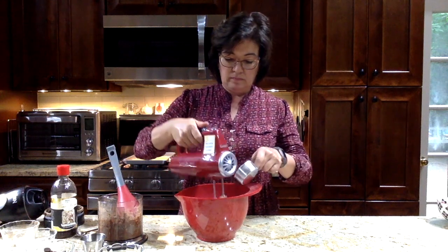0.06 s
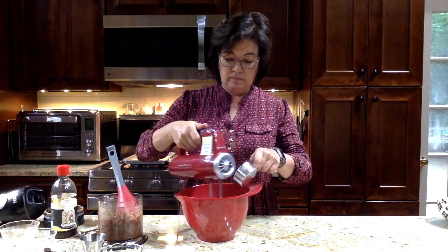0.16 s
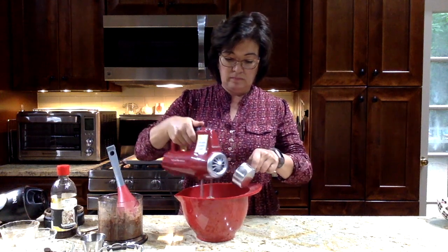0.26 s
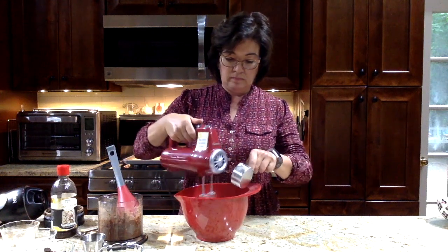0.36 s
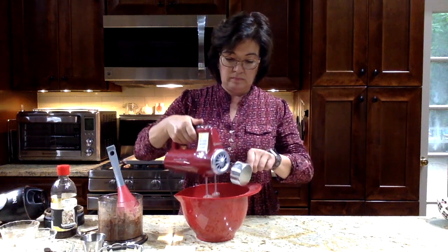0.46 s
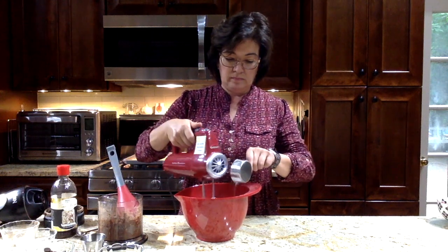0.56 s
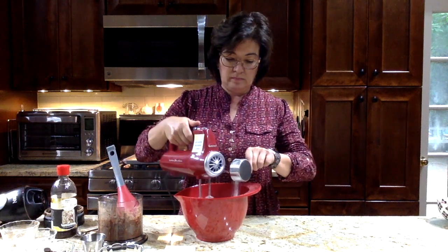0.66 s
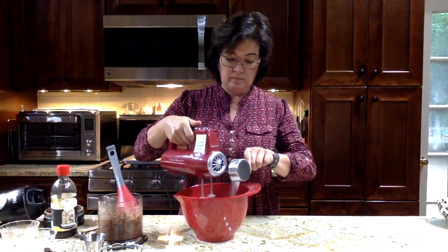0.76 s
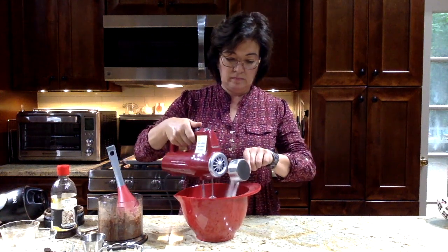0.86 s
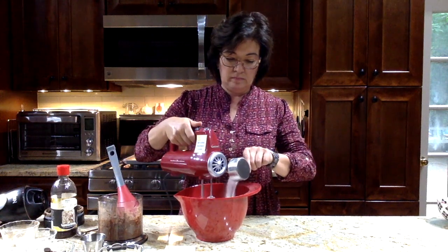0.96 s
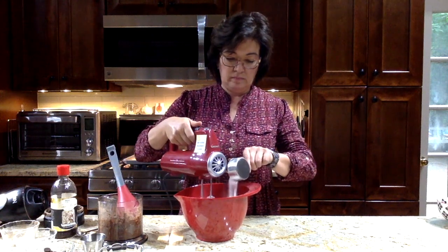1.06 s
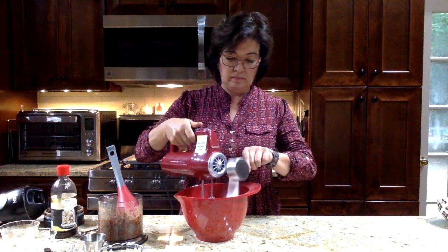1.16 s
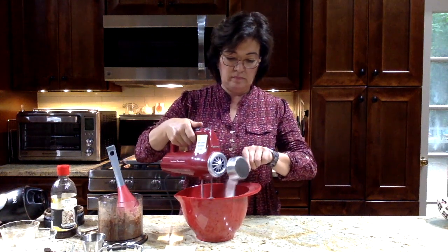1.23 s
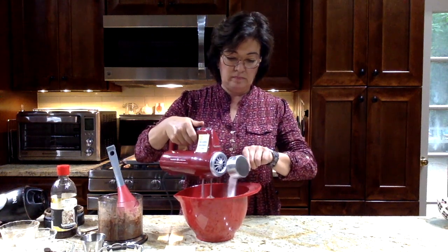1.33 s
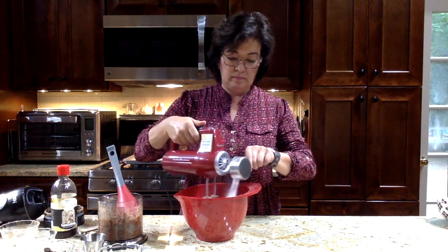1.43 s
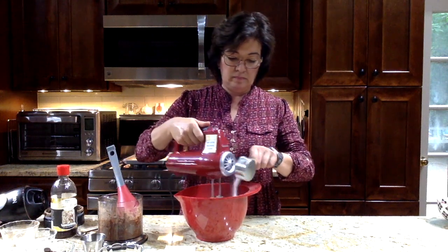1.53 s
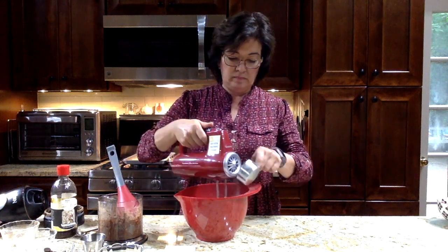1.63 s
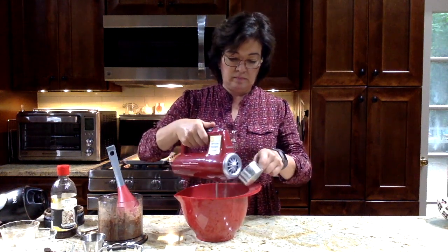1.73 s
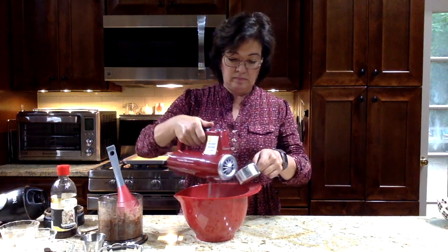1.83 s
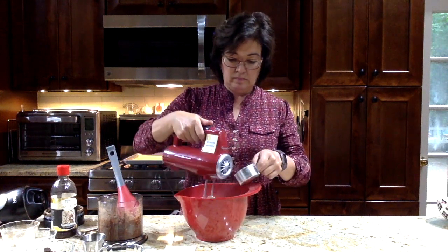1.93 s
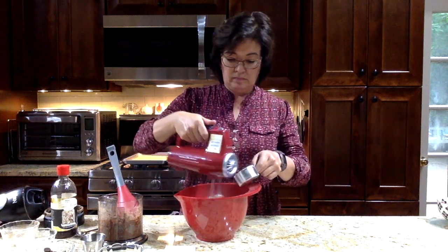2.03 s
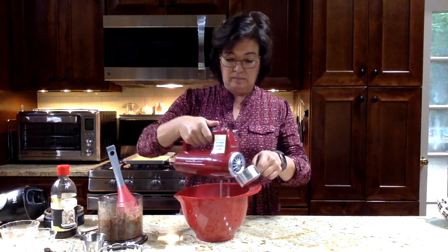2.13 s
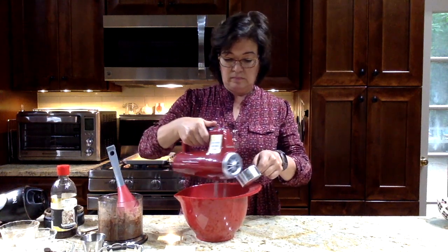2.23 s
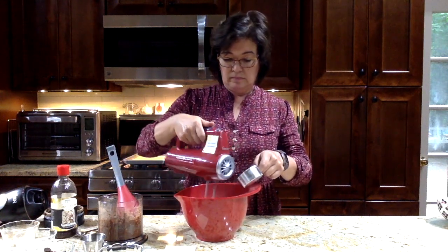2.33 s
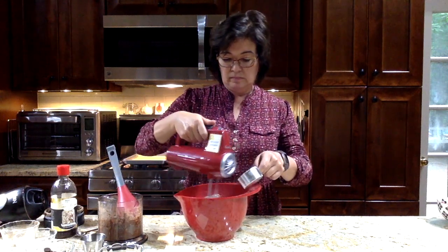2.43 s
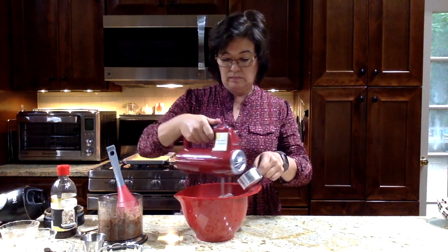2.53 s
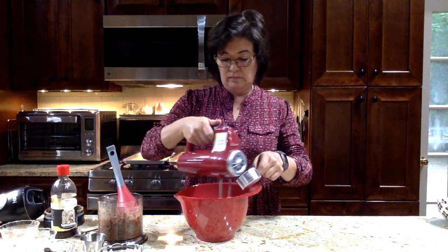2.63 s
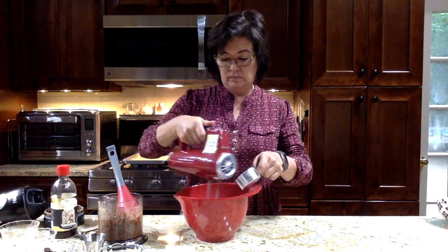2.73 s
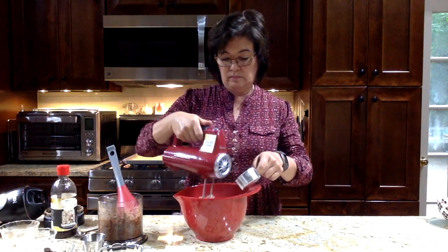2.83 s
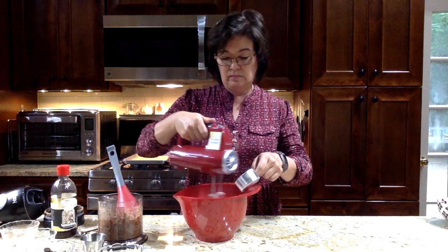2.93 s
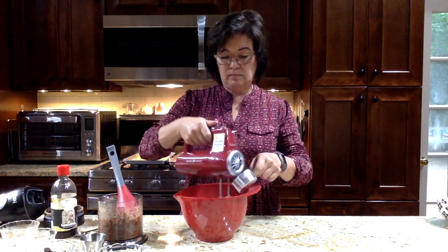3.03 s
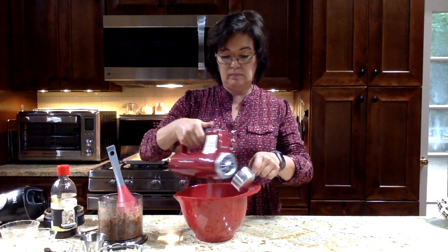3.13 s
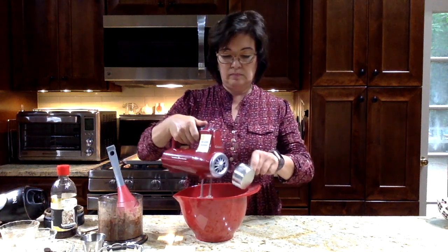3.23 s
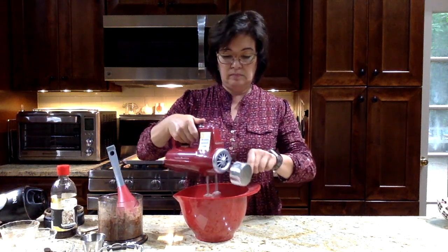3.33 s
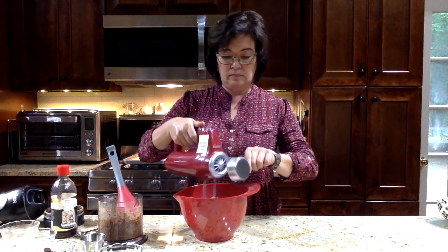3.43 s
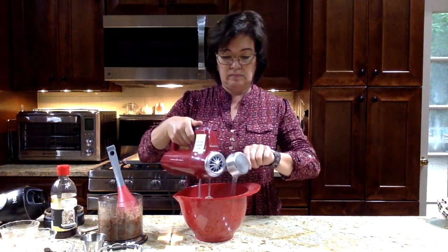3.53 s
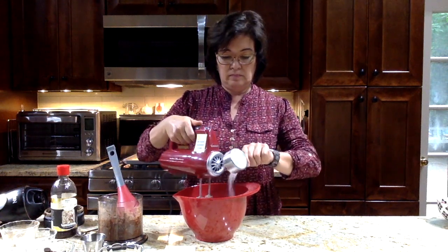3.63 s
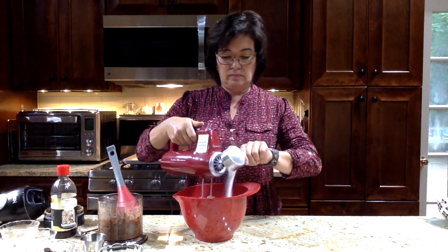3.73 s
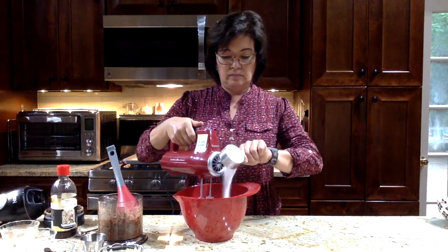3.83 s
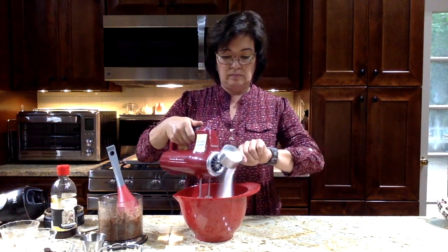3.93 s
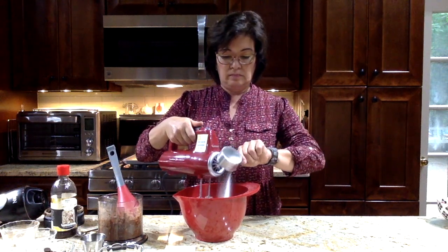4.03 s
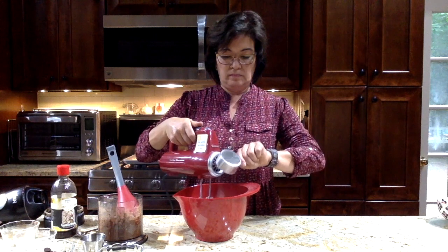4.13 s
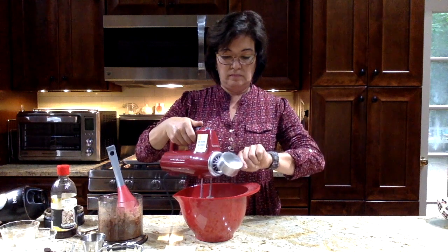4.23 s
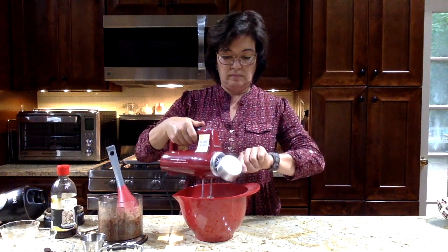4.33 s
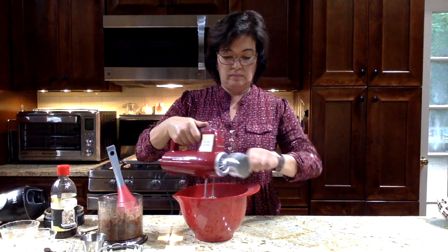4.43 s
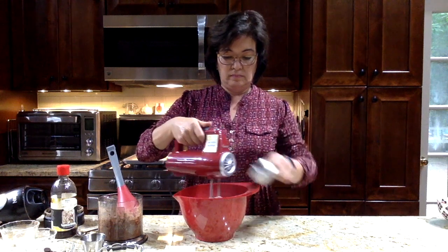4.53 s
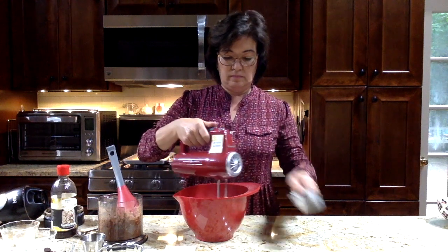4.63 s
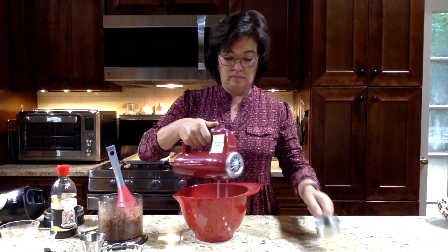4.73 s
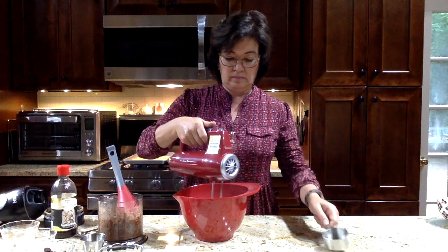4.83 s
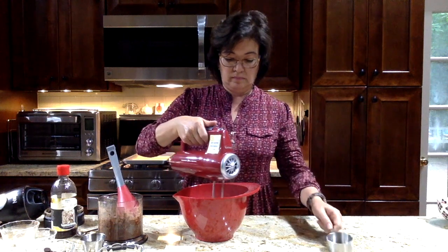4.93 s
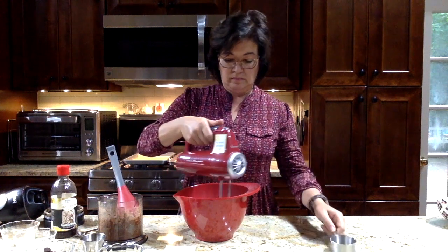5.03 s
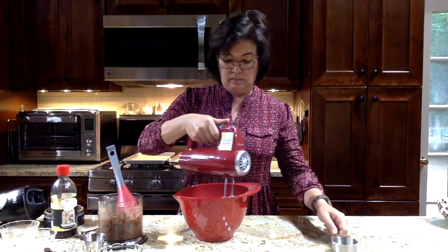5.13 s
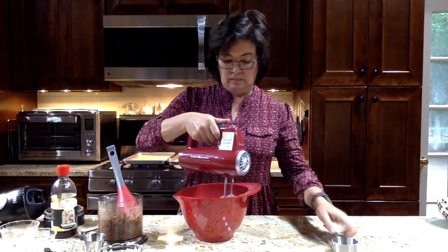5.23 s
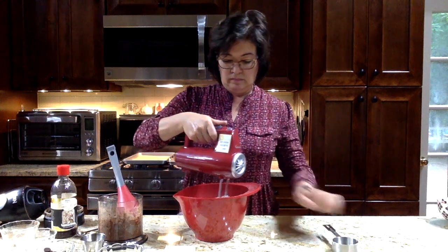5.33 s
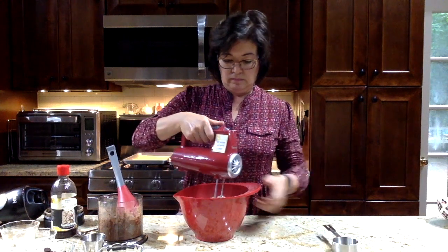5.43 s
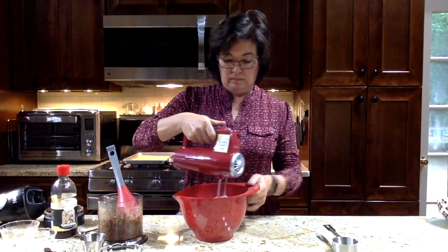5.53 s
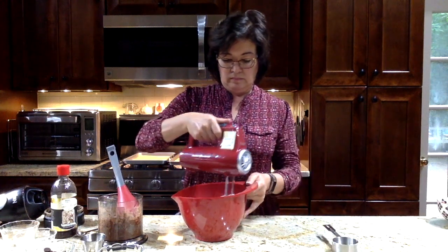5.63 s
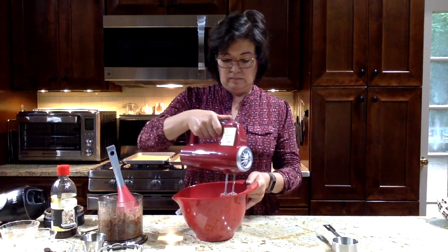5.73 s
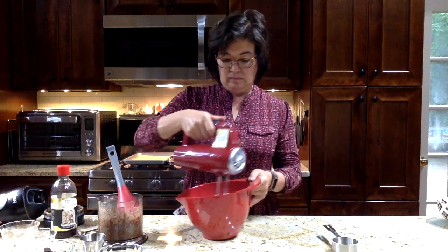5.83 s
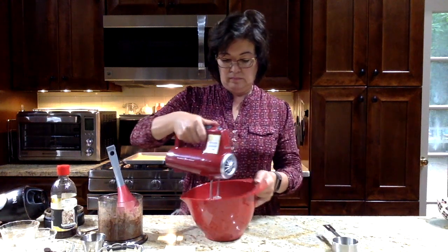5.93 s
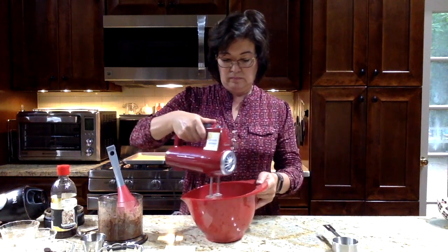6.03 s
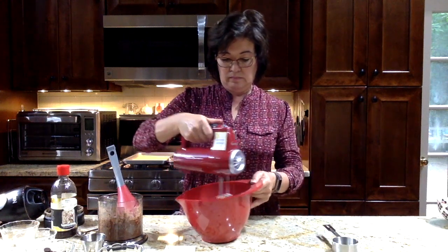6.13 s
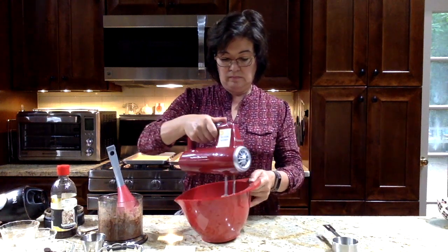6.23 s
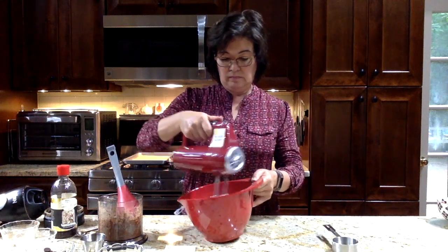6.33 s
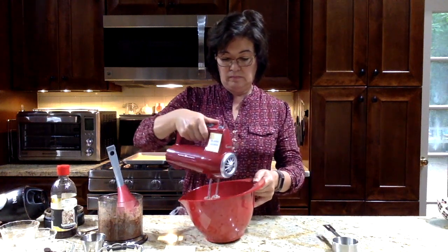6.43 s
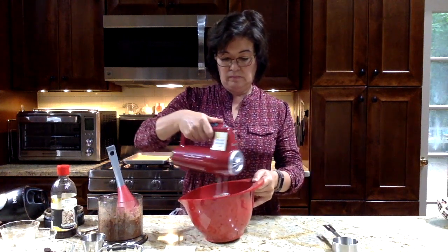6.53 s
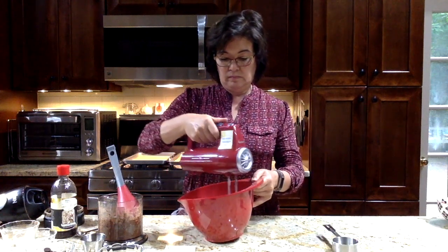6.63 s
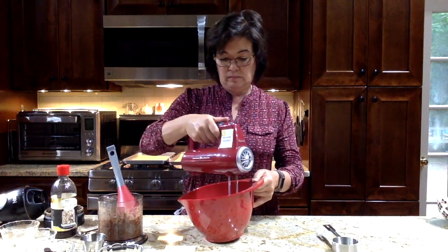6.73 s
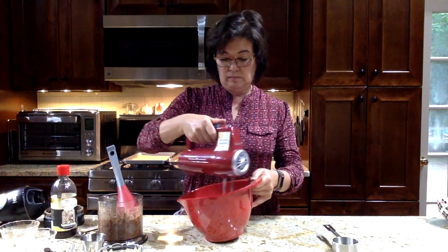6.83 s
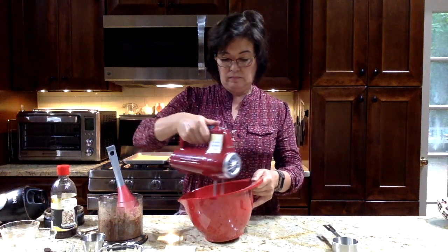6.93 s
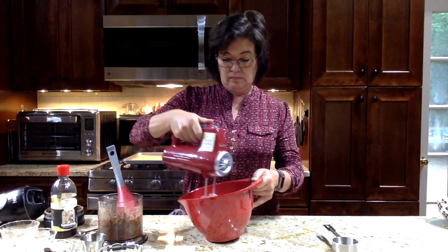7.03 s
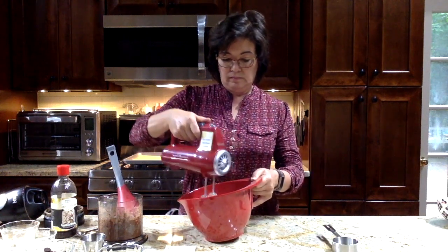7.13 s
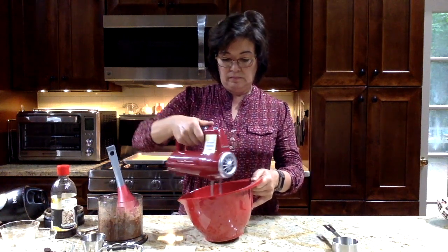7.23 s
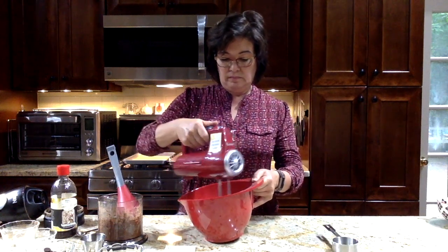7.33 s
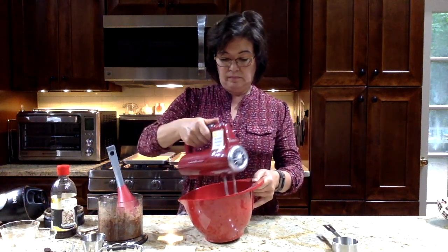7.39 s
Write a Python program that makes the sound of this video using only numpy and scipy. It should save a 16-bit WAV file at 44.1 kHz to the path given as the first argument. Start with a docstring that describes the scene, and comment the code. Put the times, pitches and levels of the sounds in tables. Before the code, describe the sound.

Steady whirring of a kitchen hand mixer whipping wet foam, with soft gulps, a small metal cup skid and a sharp burst of beater clatter.

```python
"""A motor hums and whines steadily over the rush of its fan: an electric hand mixer in a small kitchen, in mono.
Near-harmonic sines at multiples of the shaft rate make the hum; filtered noise makes the fan.
Its beaters spatter, slosh and fizz through egg whites, harder as they dip: filtered impacts and decaying tones.
The wires squeak (stick-slip tones) and rattle (struck resonances) against the plastic bowl, loudest when
a hand takes hold of it after setting down a cup."""
import sys
import numpy as np
from scipy import signal
from scipy.fft import rfft, irfft
from scipy.io import wavfile
from scipy.ndimage import uniform_filter1d

SR = 44100
rng = np.random.default_rng(int(sys.argv[2]) if len(sys.argv) > 2 else 0)


def wrap_up_sound(samples):
    """Save the sound to the file named by the first command line argument, as 16-bit audio."""
    columns = np.atleast_2d(samples).T
    # keep every value between -1 and 1, then stretch to whole-number steps
    tamed = np.clip(columns, -1, 1)
    steps = np.round(tamed * 32767).astype(np.int16)
    wavfile.write(sys.argv[1], SR, steps)


N = 328986
T = np.arange(N) / SR  # t/s of every sample
TOP_HZ = 15700  # upper band limit

# The shaft slows under load, and a little more as the foam stiffens
SHAFT_HZ, SAG_HZ_PER_DB, SAG_HZ_PER_S = 435.5, .22, .28
COMMUTATOR_BARS = 16
BEATER_GEAR = 24  # shaft turns for one beater turn
GULP_HZ, GULP_SPREAD = 188, .04  # mean pitch, and its relative standard deviation

# Levels of events and colours are relative: each source sets its own gain.
# Motor hum: [multiple of the shaft rate, rms level/dB at zero load, growth/(dB per dB of load), waver/dB]
MOTOR_HARMONICS = [(1.001, -58, 0, 1), (2.001, -52, 0.3, 1.3), (2.998, -51.5, 0.24, 3),
                   (4.01, -55, -0.5, 3), (5.014, -56.5, 0.86, 3.5), (5.99, -62.5, 0, 2.5),
                   (12, -71, 1, 2.5), (17, -71, 3, 2.5), (24, -68, 0, 1), (32, -67, -1, 2)]
# Spectrum of the cooling air and brush noise: [f/Hz, level/dB]
FAN_SPECTRUM = [(35, -67), (60, -30), (385, -7.5), (433, -17.5), (497, -12), (627, -26), (773, -10.5),
                (869, -10), (976, -12), (1320, 4.5), (2050, -9.5), (5080, -0.5), (7370, -16),
                (12600, -10.5), (15500, -20)]
# Spectrum of the lower, churning foam noise: [f/Hz, level/dB]
CHURN_SPECTRUM = [(250, -29), (400, -11), (520, -15.5), (620, -4.5), (780, -12), (980, -7), (1130, 1),
                  (1550, -1.5), (1850, -3.5), (2100, -11.5), (2600, -7.5), (3500, -37)]
# Spectrum of the droplets that spatter: [f/Hz, level/dB]
SPATTER_SPECTRUM = [(1200, -15), (2100, -5.5), (2900, -7), (3200, -2.5), (3700, -0.5), (4350, -6),
                    (4900, -1.5), (5250, -5), (5800, -4), (6400, -11), (7200, -33), (9000, -24)]
# Spectrum of the fine spray: [f/Hz, level/dB]
SPRAY_SPECTRUM = [(5500, -26), (6800, 0.5), (7400, -1.5), (8200, -0.5), (9250, 4), (9900, -1), (10400, 1.5),
                  (11600, -2), (12500, 2), (13200, 2.5), (13900, 0.5), (15600, -1)]
# Spectrum of the foam mass as it swills: [f/Hz, level/dB]
SWILL_SPECTRUM = [(25, -34), (65, -37), (90, -8.5), (125, -9), (180, 5), (225, -1.5), (260, -4), (320, 6),
                  (400, -2.5), (600, -12)]
# How hard the beaters bite as the hand lowers and lifts them: [t/s, load level/dB]
BEATER_LOAD = [(0, 3.5), (0.27, 1.5), (0.72, 2.5), (1.15, -1.5), (1.55, -5), (1.95, -1.5), (2.13, -2.5),
               (2.35, 1), (2.52, -1.0), (2.7, 4.0), (3.3, 1.5), (3.95, -4.5), (4.52, -5.5), (4.8, 3.5),
               (5.25, 4.5), (5.6, 2.5), (5.95, 5.5), (7.46, 1.0)]
# The commutator whine flares up: [t/s at the peak, half length/s, rise in level/dB]
WHINE_FLARES = [(.49, 0.065, 8), (.94, 0.11, 5), (4.54, .05, 9.5), (6.1, .05, 8), (6.45, 0.06, 17),
                (7.18, 0.069, 19)]
# The beaters graze the bowl wall and fling more foam: [t/s at the peak, half length/s, rise in level/dB]
WALL_GRAZES = [(.46, 0.058, 6), (2.67, 0.07, 6.5), (3.05, .05, 3.5), (5.26, 0.093, 3.5), (5.77, 0.076, 7.5),
               (6.32, 0.059, 4.5), (6.79, 0.077, 7), (7.19, .06, 4.5)]
# Large air pockets that close in the foam: [t/s, peak level/dB]
AIR_POCKETS = [(.678, -44), (.784, -42), (.828, -41), (1.564, -38.5), (2.152, -38), (2.56, -34),
               (2.659, -31.5), (3.05, -31.5), (3.299, -38), (3.342, -36.5), (3.695, -40), (4.718, -35),
               (4.826, -34), (5.07, -35), (5.135, -29), (5.236, -32), (5.392, -33), (5.417, -33),
               (5.566, -38), (5.67, -30), (6.513, -34)]
# A beater knocks on the bowl: [t/s, level/dB, brightness/(dB per octave)]
BEATER_KNOCKS = [(0.423, -28.5, 3), (2.642, -28, 13), (2.664, -25, 16), (2.687, -30, 2), (5.721, -21, -1),
                 (5.7264, -10.5, 2), (5.7445, -8.5, -2), (5.752, -9.5, -1.5), (5.756, -11.5, 5.5),
                 (5.763, -6, -2.5), (5.768, -10, 2), (5.801, -9.5, -12), (5.806, -13.5, -13),
                 (5.813, -9, -5.5), (5.82, -23, 10), (5.845, -20, -8), (5.855, -27, -7), (6.301, -19, -2),
                 (6.309, -17.5, -2), (6.3175, -21.5, 2)]
# Modes with which bowl and beaters ring: [f/Hz, width/Hz, level/dB]
BOWL_MODES = [(192, 230, -27.5), (640, 190, -24.5), (1123, 170, -11.5), (1530, 640, -20), (2160, 320, -18),
              (2800, 280, -3), (3063, 170, 1), (3278, 140, 2.5), (3690, 220, 6), (3867, 146, 4.5),
              (4820, 330, -2.5), (5380, 180, -11), (5740, 210, -9), (7000, 290, -17), (7900, 490, -10.5),
              (8880, 260, -12.5), (10380, 970, -11.5), (10850, 450, -13.5), (11850, 970, -20),
              (14300, 540, -14), (15200, 600, -27)]
# A wire catches and slips on the bowl: [t/s, peak level/dB, f/Hz, length/s]
WIRE_SLIPS = [(2.653, -18.5, 7900, 0.0036), (2.654, -20, 3820, 0.006), (2.663, -23, 3780, 0.0051),
              (2.695, -21, 3970, 0.013), (5.227, -16.5, 8080, 0.0048), (5.278, -22, 14900, .006),
              (5.292, -26, 7600, .008), (5.292, -24, 9750, .006), (5.753, -16, 14200, 0.0064),
              (5.944, -18.5, 3560, 0.0056), (6.299, -7, 4700, 0.0052), (6.31, -17, 15000, .006),
              (6.746, -20, 3400, 0.0066), (6.757, -16, 3570, 0.0077), (6.814, -23, 7640, .006),
              (6.814, -16, 15300, .006)]
# A steel measuring cup skids as it is set on the counter: [t/s, peak level/dB, f/Hz, length/s]
CUP_SKID = [(4.991, -13, 1883, 0.0096)]


def motor(turns, load):
    """Periodic forcing: near-harmonics of the shaft rate grow or shrink with load and waver as the hand moves."""
    turns = turns + 0.0085 * walk(12)  # rms phase jitter in turns
    hum = 0
    for multiple, db, per_load, waver_db in MOTOR_HARMONICS:
        level = db + per_load * load + waver_db * np.minimum(walk(10), 1)
        phase = 2 * np.pi * (multiple * turns + rng.random())
        hum = hum + undb(level) * np.sin(phase)
    return np.sqrt(2) * hum


def whine(turns, load, db=-55, per_load=0.38, waver_db=2.5):
    """Bar-passing excitation: the brushes sing, unevenly, at the rate of the commutator bars."""
    level = db + per_load * load + swells(WHINE_FLARES) + waver_db * walk(16)
    jittered = turns + 0.0085 * walk(12)
    return np.sqrt(2) * undb(level) * np.sin(2 * np.pi * COMMUTATOR_BARS * jittered)


def fan(turns, db=-45, depth=0.35):
    """Amplitude-modulated turbulence: cooling air and brush noise pulse once a shaft turn."""
    pulse = 1 + depth * np.sin(2 * np.pi * turns)
    return undb(db) * colour(rng.standard_normal(N) * pulse, FAN_SPECTRUM)


def foam(turns, load, graze, surge_db=0.7, lap_db=0.2, blade_db=0.2):
    """Random impact excitation: wires cut the foam four times a beater turn and throw droplets on the bowl."""
    angle = 2 * np.pi * turns / BEATER_GEAR + 2 * walk(5)  # radians, with a wander
    stroke = undb(lap_db * np.sin(angle) + blade_db * np.sin(4 * angle) + surge_db * walk(45))
    spatter = colour(stroke * droplets(9000, 1.4), SPATTER_SPECTRUM)
    spray = colour(stroke * droplets(16000, 2.7), SPRAY_SPECTRUM)
    churn = colour(stroke * droplets(4000, 1.64), CHURN_SPECTRUM)
    out = driven(load, graze, db=-38.5, per_load=1.14, per_graze=0.48) * spatter
    out += driven(load, graze, db=-43.0, per_load=1.0, per_graze=0.91) * spray
    out += driven(load, graze, db=-43.0, per_load=1.0, per_graze=0.88) * churn
    return out


def slosh(load, graze, lurch_db=2.5):
    """Bulk motion of a fluid: the foam lurches round the bowl, full of small closing air pockets."""
    gain = driven(load, graze, db=-55.5, per_load=1.5, per_graze=0.8)
    return gain * undb(lurch_db * walk(9)) * colour(droplets(300, 4.0), SWILL_SPECTRUM)


def fizz(spray_gain, count=900, low_hz=7500, high_hz=15500, life_s=0.0076, spread_db=3.0):
    """Bubble resonance: tiny bubbles ring briefly in the foam, as loud as the spray is thick."""
    out, t = np.zeros(N), T[:SR // 20]
    ring = t / life_s * np.exp(1 - t / life_s)
    for when, size, strength, glide in rng.random((count, 4)):
        i = int(when * N)
        hz = low_hz + size * (high_hz - low_hz)
        tone = np.sin(2 * np.pi * hz * t * (1 + (glide - .5) * t / 2))  # pitch drifts slightly up or down
        level = spread_db * (min(-np.log(strength), 3) - 2)
        add(out, T[i], spray_gain[i] * undb(level) * ring * tone)
    return out


def gulps(rise_s=0.0084, sharpness=4.8, gain_db=-1.0, wake_db=-8, wake_s=0.022):
    """Cavity collapse: each air pocket thuds softly for about two cycles, and foam tumbles in behind it."""
    out, wake, t = np.zeros(N), np.zeros(N), T[:SR // 8]
    swell = (t / rise_s * np.exp(1 - t / rise_s)) ** sharpness
    tumble = np.minimum(t / rise_s, 1) * np.exp(-t / wake_s)
    for s, db in AIR_POCKETS:
        hz = GULP_HZ * (1 + GULP_SPREAD * rng.standard_normal())
        add(out, s, undb(db + gain_db) * swell * np.sin(2 * np.pi * hz * (t - rise_s)))
        add(wake, s, undb(db + wake_db) * tumble)
    return out + wake * colour(rng.standard_normal(N), SWILL_SPECTRUM)


def knocks(chatter_s=0.0041, bounce_s=0.0008):
    """Modal excitation: a wire strikes, chatters briefly over the bowl wall and rings its modes."""
    out, t = np.zeros(N), T[:4096]
    f = np.maximum(np.fft.rfftfreq(len(t), 1 / SR), 1)
    body = sum(undb(db) / (1 + 1j * (f * f - hz * hz) / (f * width)) ** 2 for hz, width, db in BOWL_MODES)
    octaves = np.log2(np.maximum(f / 3500, 1))  # brightness acts above 3500 Hz
    for s, db, tilt_db in BEATER_KNOCKS:
        strength = rng.uniform(-1.0, 1, len(t))
        bounces = rng.random(len(t)) < 1 / (bounce_s * SR)
        push = strength * bounces * np.exp(-t / chatter_s)
        push[0] = 1  # the first strike
        ring = irfft(rfft(push) * body * undb(tilt_db * octaves))
        add(out, s, undb(db) * ring / np.std(ring[:SR // 200]))  # level over the first 5 ms
    return out


def squeaks(table, octave_db, gain_db):
    """Stick-slip friction: an unsteady tone, with its octave where the band allows, lasts milliseconds."""
    out, t = np.zeros(N), T[:SR // 40]
    for s, db, hz, length in table:
        swell = np.clip(t / (.18 * length), 0, 1) * np.exp(-(t / length) ** 4)
        pitch = hz * (1 + .018 * unit(uniform_filter1d(rng.standard_normal(len(t)), size=16)))
        phase = 2 * np.pi * np.cumsum(pitch) / SR
        octave = (2 * hz < TOP_HZ) * undb(octave_db) * np.sin(2 * phase)
        add(out, s, undb(db + gain_db) * swell * (np.sin(phase) + octave))
    return out


def kitchen(x, t60, wet_db):
    """Reverberation: counter and cupboards answer with a short, dense, exponentially decaying tail."""
    t = T[:SR // 2]
    tail = rng.standard_normal(len(t)) * np.exp(-np.log(1000) * t / t60) * (t > .004)
    wet = signal.fftconvolve(x, tail / np.sqrt(np.sum(tail ** 2)))[:N]
    return (x + undb(wet_db) * wet) / np.hypot(1, undb(wet_db))


def driven(load, graze, db, per_load, per_graze):
    """Forced response: the gain of a layer rises with the load and when the beaters graze the wall."""
    return undb(db + per_load * load + per_graze * graze)


def droplets(rate, spread_db):
    """Poisson-like shot noise: dense tiny impacts of uneven size, at a mean rate per second."""
    hit = rng.random(N) < rate / SR
    size_db = spread_db * np.clip(rng.standard_normal(N), -2, 2)
    return unit(hit * rng.standard_normal(N) * undb(size_db))


def colour(x, points):
    """Linear filtering: shape a spectrum through (f/Hz, level/dB) points, then scale to an rms of one."""
    hz, db = np.transpose(points)
    f = np.maximum(np.fft.rfftfreq(N, 1 / SR), 1)
    gain = undb(np.interp(np.log(f), np.log(hz), db, left=-70, right=-70))
    return unit(irfft(rfft(x) * gain, N))


def walk(rate):
    """Smoothed random process: levels held for 1 / rate seconds and slewed twice, with an rms of one."""
    k = int(SR / rate)
    held = np.repeat(rng.standard_normal(N // k + 1), k)
    return unit(uniform_filter1d(uniform_filter1d(held, k), k)[:N])


def swells(table):
    """Gaussian envelopes: bell-shaped rises in dB, one for each row (t/s, half length/s, rise/dB)."""
    return sum(db * np.exp(-((T - s) / length) ** 2) for s, length, db in table)


def curves(table):
    """Linear interpolation: each column of a table of rows (t/s, ..), sample by sample."""
    s, *columns = np.transpose(table)
    return [np.interp(T, s, c) for c in columns]


def add(out, s, sound):
    """Superposition: mix a sound in at time s."""
    i = int(s * SR)
    out[i:i + len(sound)] += sound[:N - i]


def unit(x):
    """Normalisation: scale to an rms of one."""
    return x / np.sqrt(np.mean(x ** 2))


def undb(db):
    """Logarithmic level: decibels to amplitude gain."""
    return 10 ** (np.asarray(db) / 20)


def scene():
    """Common drive: one shaft turns motor, fan and beaters, and load sets speed and level; channels are alike."""
    load, graze = curves(BEATER_LOAD)[0], swells(WALL_GRAZES)
    shaft_hz = SHAFT_HZ - SAG_HZ_PER_DB * load - SAG_HZ_PER_S * T
    turns = np.cumsum(shaft_hz) / SR
    bubbles = fizz(driven(load, graze, db=-47.0, per_load=0.9, per_graze=1.0))
    whipping = foam(turns, load, graze) + slosh(load, graze) + bubbles
    mixer = motor(turns, load) + whine(turns, load)
    mixer = mixer + kitchen(fan(turns) + whipping, t60=0.39, wet_db=-6)
    slips = squeaks(WIRE_SLIPS, octave_db=-24, gain_db=-1.5) + squeaks(CUP_SKID, octave_db=-28, gain_db=-1)
    rattle = kitchen(knocks(), t60=0.19, wet_db=-6.0)
    contacts = rattle + kitchen(gulps() + slips, t60=0.14, wet_db=-7.5)
    return np.tile(mixer + contacts, (2, 1))


def record(dry):
    """Saturation and band limiting: peaks beyond full scale clip, and the top is cut."""
    low_pass = signal.ellip(10, .1, 70, TOP_HZ, fs=SR, output="sos")
    return signal.sosfilt(low_pass, np.clip(dry, -1, 1))


dry = scene()
out = record(dry)
wrap_up_sound(out)
```